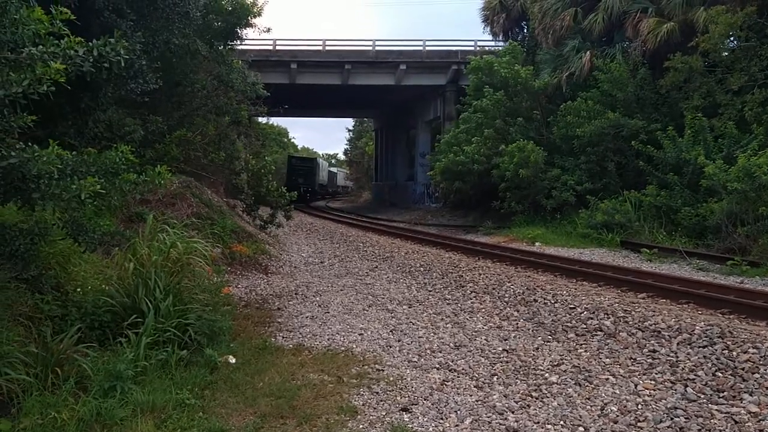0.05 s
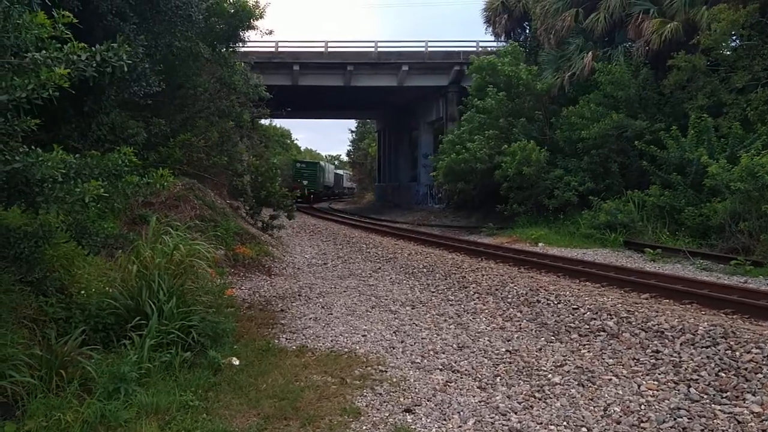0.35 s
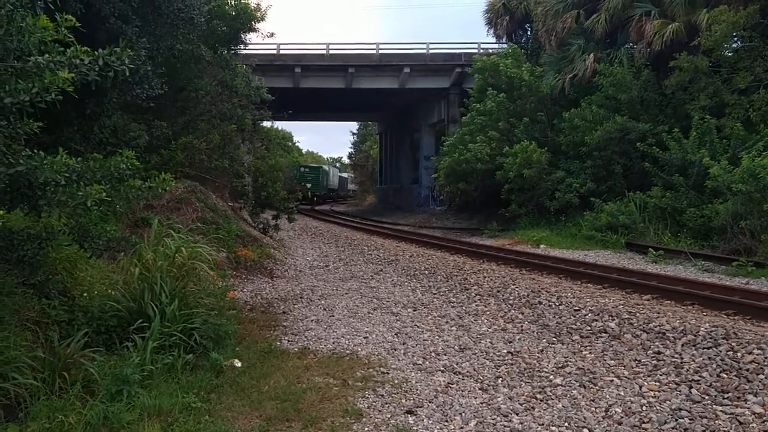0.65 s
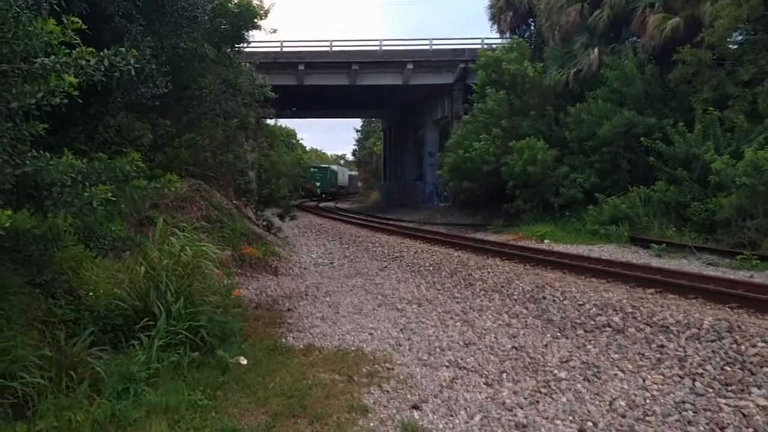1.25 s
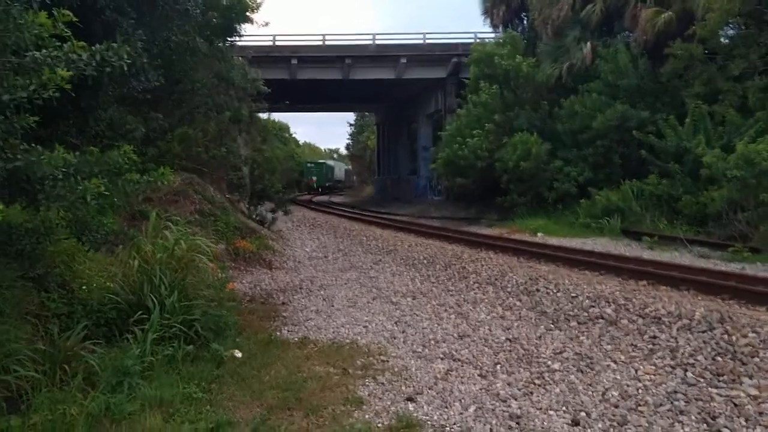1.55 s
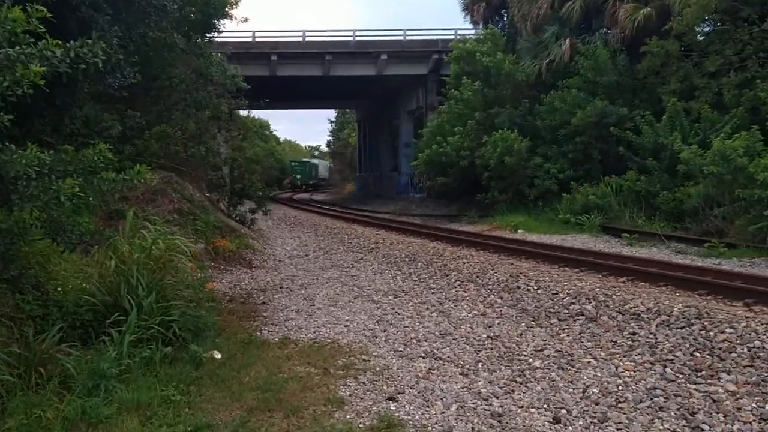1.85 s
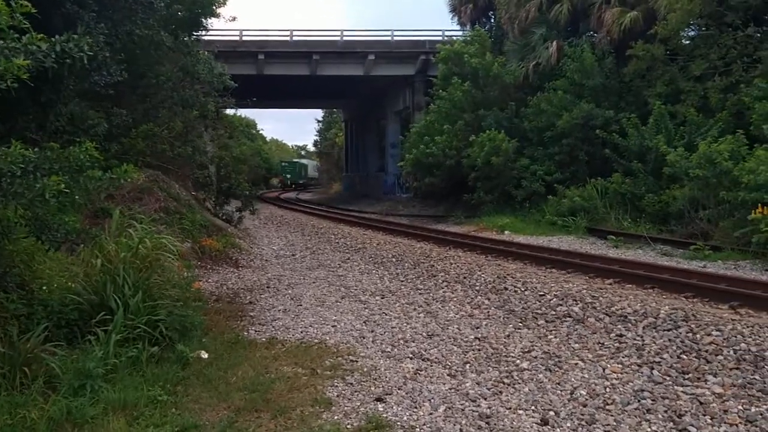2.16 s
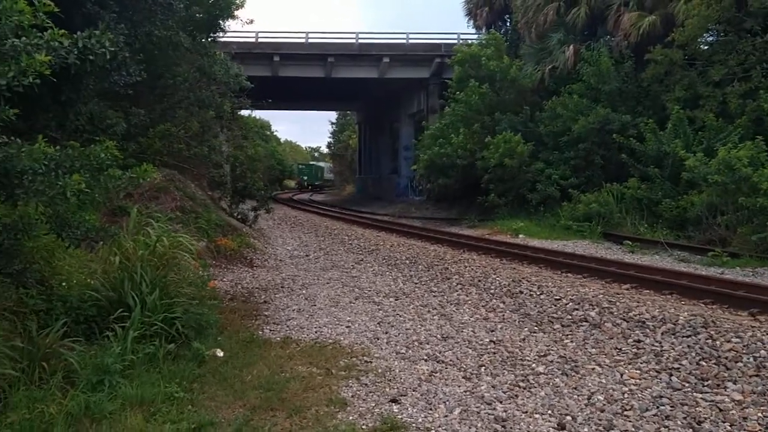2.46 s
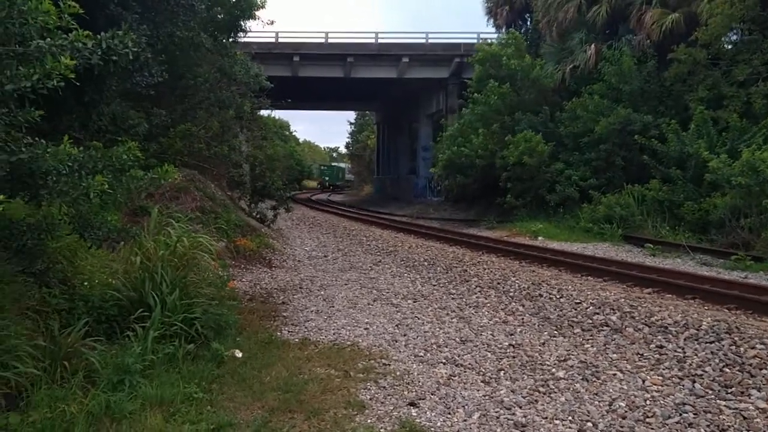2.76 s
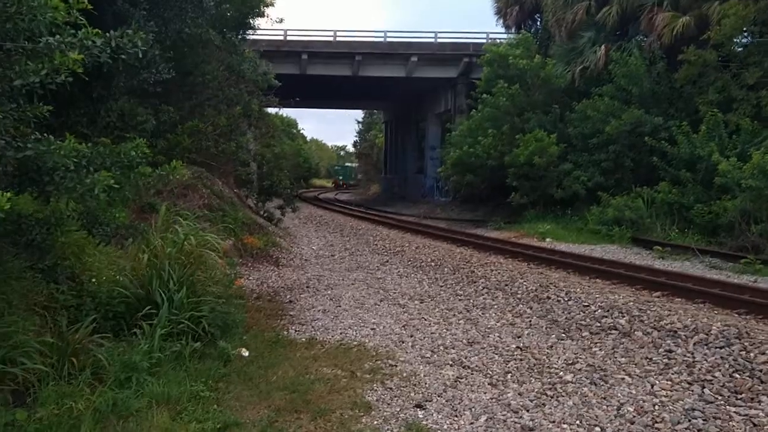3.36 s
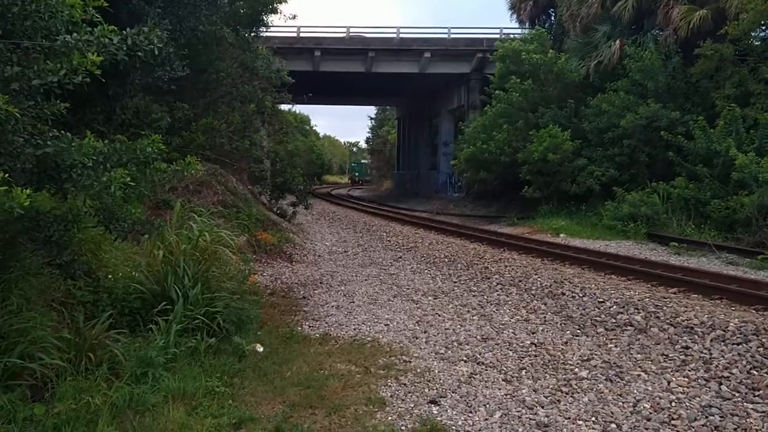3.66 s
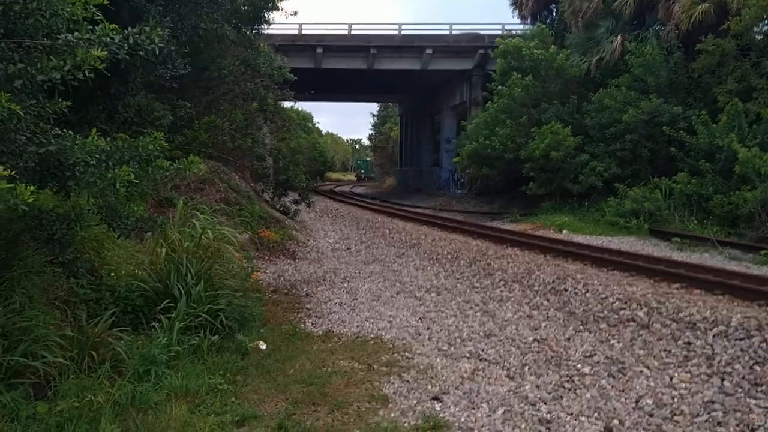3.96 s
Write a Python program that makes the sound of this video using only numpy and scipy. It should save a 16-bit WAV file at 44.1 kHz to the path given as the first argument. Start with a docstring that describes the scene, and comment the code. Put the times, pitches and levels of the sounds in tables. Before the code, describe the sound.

A train's last car recedes under a road bridge, heard from the trackside. Rolling noise and thin steel squealing give way to fast, regular wheel thuds and a few sharp metallic snaps, all growing steadily fainter.

```python
"""Last train car rolling away

The car recedes along ballasted track and under a road bridge. Rough wheels and rail rumble and
roar, rubbing steel sings and squeals, and it all fades into a distant wash. Once a wheel turn a
flat spot strikes the rail: a thud of the track with a steel clank, scattered by trees and the
bridge. A few sharp snaps cut through along the way."""
import sys
import numpy as np
from scipy import signal
from scipy.fft import rfft, irfft
from scipy.io import wavfile
from scipy.ndimage import uniform_filter1d

SR = 44100
rng = np.random.default_rng(int(sys.argv[2]) if len(sys.argv) > 2 else 0)


def generate_wav(signal):
    """Clip the signal to [-1, 1] and save it as 16-bit WAV at the path in sys.argv[1]."""
    frames = np.transpose(np.atleast_2d(signal))
    scaled = np.clip(frames, -1, 1) * 32767
    pcm = np.round(scaled).astype(np.int16)
    wavfile.write(sys.argv[1], SR, pcm)


N = 176400

# Hits of the flat spot. Each row: start in seconds, then thud, clank and treble in relative dB.
BLOWS = [(.960, -21.5, -32.5, -62), (1.125, -28, -29.5, -55), (1.280, -20.5, -27.5, -60),
         (1.441, -17.5, -28.5, -67), (1.597, -21, -30.5, -47), (1.757, -21, -31.5, -40.5),
         (1.917, -22, -33.5, -42.5), (2.077, -25, -36.5, -46), (2.237, -26.5, -42, -49.5),
         (2.398, -28.5, -46.5, -51.5), (2.556, -27, -47, -48), (2.717, -27, -45, -48.5),
         (2.876, -28.5, -41.5, -46), (3.035, -28.5, -41, -45), (3.195, -29.5, -43.5, -49),
         (3.355, -23, -42.5, -47), (3.515, -34.5, -43, -51), (3.675, -37, -46.5, -50),
         (3.834, -34, -46.5, -52), (3.991, -37.5, -39, -54)]
# Steel snaps. Each row: start in seconds, then crack and knock in relative dB.
SNAPS = [(1.4005, -37, -70), (1.5625, -27, -50), (1.5714, -49, -53), (1.598, -21, -29.5),
         (1.6041, -17.5, -35)]
# Slaps off the bridge. Each row: delay in seconds, level against the thud in dB when fully wet.
BRIDGE_ECHOES = [(0.0154, -5.5), (0.0247, -7.5)]
# Wheel squeals. Each row: centre and half length in seconds, pitch and wander in Hz, level in dB.
SQUEALS = [(.235, 0.022, 2960, 60, -32.5), (0.31, .04, 6750, 10, -30), (2.365, 0.074, 1490, 9.7, -55)]

# Struck bodies. Each row: pitch in Hz, relative level in dB, time to fall 60 dB in seconds.
TRACK_MODES = [(78, -27.5, .08), (114, -10.5, 0.09), (132.3, 1, 0.074), (165, -6, 0.04), (185, -3.5, .055)]
WHEEL_MODES = [(564, -4, 0.15), (1050, -3.5, 0.3), (1104, 2.5, 0.25), (1129, -3.5, 0.42),
               (1536, -13.5, 0.2), (1880, -15, 0.23), (1995, -9.5, 0.13), (2420, -10.5, 0.17)]
KNOCK_MODES = [(165, -0.5, 0.046), (257, 0, .05), (300, 6.5, 0.043), (355, 4.5, 0.046), (430, -13, .05),
               (556, -5, .05)]

# Ringing peaks in noise. Each row: centre in Hz, half width in Hz, relative level in dB.
WHEEL_RAIL_PEAKS = [(568, 83, 2.5), (1098, 17, 7.5), (1508, 118, 4.5), (1946, 16, -0.5), (1926, 39, 0.5),
                    (2444, 20, 2.5)]
FAR_RAIL_PEAKS = [(375, 12, -3.5), (555, 89, -1), (964, 110, -4), (1470, 91, 2), (1970, 70, -2.5),
                  (2560, 47, 5.5), (4480, 150, -2)]
SING_PEAKS = [(3250, 160, -15), (4540, 10, -19), (5070, 90, -23), (5595, 14, -8), (5700, 30, -14),
              (6228, 20, -1), (6455, 60, -6), (6790, 18, 0), (6930, 50, -10), (7210, 22, -7),
              (7308, 16, -3), (7392, 22, -3), (7465, 35, -4), (7620, 90, -11), (7890, 45, -7),
              (8105, 40, -11)]

# EQ curves for the noise layers. Each row: frequency in Hz, relative level in dB.
THUD_TAIL_EQ = [(30, -27.5), (70, -9.5), (110, 0.5), (140, -0.5), (190, -4.5), (240, -17), (400, -31.5)]
CLANK_EQ = [(150, -14.5), (290, -11), (350, 4), (430, -2.5), (540, 0), (750, -7.5), (950, -0.5),
            (1270, -5.5), (1550, -2), (2500, -9), (3500, -16), (5000, -46), (9000, -46)]
TREBLE_EQ = [(1200, -12), (2800, 14.5), (4000, 12.5), (5500, 6), (7500, 2.5), (9000, -42)]
RUMBLE_EQ = [(20, -35.5), (40, -27), (65, -9.5), (90, -3), (115, 0), (165, 2.5), (215, -1.5), (250, -13),
             (400, -26), (900, -69)]
ROAR_EQ = [(120, -19.5), (270, -4.5), (540, 0.5), (760, -2), (1000, 1.5), (1270, -2), (1550, -1.5),
           (1900, 2.5), (2700, 0.5), (3300, -11), (3700, -25.5), (4300, -28), (6000, -27), (9000, -48)]
WASH_EQ = [(120, -13.5), (290, -7), (370, -0.5), (600, -1), (760, -4), (1490, -9.5), (2600, -13.5),
           (3500, -13), (4450, -14), (5500, -17.5), (7100, -19.5), (8000, -37.5), (10000, -68)]
HISS_EQ = [(2500, -21), (3500, -6), (4300, -17), (5200, -7.5), (6200, 4.5), (6700, 3), (7400, 4),
           (8000, -23), (9000, -29)]

# Fader moves as the car leaves. Each row: time in seconds, relative level in dB.
RUMBLE_FADER = [(0, -29), (.4, -32), (.55, -31.5), (.77, -31), (1.05, -35.5), (1.25, -33.5), (1.4, -39),
                (1.8, -40), (2.03, -44), (2.35, -49), (2.5, -53), (2.8, -46), (3.3, -51.5), (3.55, -57.5),
                (4, -55)]
ROAR_FADER = [(0, -28.5), (.17, -28.5), (.23, -26.5), (.31, -28.5), (.39, -27.5), (.47, -33.5), (.8, -35.5),
              (1.1, -37), (1.25, -36), (1.38, -41), (1.56, -41), (1.72, -47), (2, -50), (2.36, -53.5),
              (3.5, -59.5), (4, -61)]
SING_FADER = [(0, -27.5), (.24, -27.5), (.35, -30.5), (.44, -37), (.53, -46.5), (.8, -66.5), (1.5, -71.5),
              (1.7, -79.5)]
HISS_FADER = [(0, -34.5), (.26, -31.5), (.42, -35), (.53, -44), (.8, -50), (1.1, -56.5), (1.19, -50),
              (1.23, -47.5), (1.32, -50), (1.39, -58.5), (1.47, -52), (1.54, -56.5), (1.65, -56),
              (1.72, -82)]

ECHO_GROWTH_DB_PER_S, ECHO_FULL_S = 10, 2.43  # echoes gain on the thud as the wheel recedes
FIRST_RISE_S, SMEAR_S_PER_S = 0.0043, 0.0026  # clank attacks soften with distance
WHEEL_NEAR_S, WHEEL_FADE_DB_PER_S = 1.66, 9.5  # the wheel's ring falls off either side of this time
WASH_FROM_S, WASH_RISE_S, WASH_FADE_DB_PER_S = 1.577, 0.1, 5.5
FAR_RAIL_GAIN, WHEEL_RAIL_GAIN = 0.67, 0.86  # strength of the peaks over the broad noise


def flat_spot_thuds():
    """The flat spot pounds the track on its sleepers; the bridge adds two echoes and a low tail."""
    out, t = np.zeros(N), np.arange(SR // 2) / SR
    scatter = noise(eq(THUD_TAIL_EQ))
    for at, db, _, _ in BLOWS:
        thud = undb(db - 1.4) * struck(t, TRACK_MODES, rise=0.0056)
        wet = undb(ECHO_GROWTH_DB_PER_S * min(at - ECHO_FULL_S, 0))
        onset = at - .003  # just ahead of the clank
        add(out, onset, thud)
        for delay, echo_db in BRIDGE_ECHOES:
            add(out, onset + delay, wet * undb(echo_db) * thud)
        i = rng.integers(N - len(t))
        tail = scatter[i:i + len(t)] * envelope(t, rise=0.018, t60=0.25)
        add(out, at + 0.02202, np.sqrt(wet) * undb(db - 13) * tail)
    low_band = signal.butter(2, [65, 246], "bandpass", fs=SR, output="sos")
    return signal.sosfilt(low_band, out)


def flat_spot_clanks():
    """The same blows clank the steel and ring the wheel, with bright grit on top."""
    out, size = np.zeros(N), SR // 2
    t = np.arange(size) / SR
    steel_bed = noise(eq(CLANK_EQ) * (1 + FAR_RAIL_GAIN * resonances(FAR_RAIL_PEAKS)))
    grit_bed = noise(eq(TREBLE_EQ))
    for at, _, clank_db, treble_db in BLOWS:
        # Half the noise power repeats every turn, so the hits sound related.
        i = rng.integers(size, N - size)
        steel, grit = (np.sqrt(.5) * (bed[:size] + bed[i:i + size]) for bed in (steel_bed, grit_bed))
        rise = FIRST_RISE_S + SMEAR_S_PER_S * (at - BLOWS[0][0])
        steel *= envelope(t, 1.18 * rise, t60=0.063, tail_db=-7.5, tail_t60=0.39)
        grit *= envelope(t, rise, t60=.1, tail_db=-13, tail_t60=0.52)
        wheel_db = clank_db + 2 - WHEEL_FADE_DB_PER_S * abs(at - WHEEL_NEAR_S)
        add(out, at, undb(clank_db - 3) * steel)
        add(out, at, undb(wheel_db) * struck(t, WHEEL_MODES, rise))
        add(out, at, undb(treble_db - 1.5) * grit)
    return out


def rolling():
    """Rough wheels shake the track and ring the steel; as the roar dies, a distant wash takes over."""
    rumble = noise(eq(RUMBLE_EQ)) * fader(RUMBLE_FADER) * undb(drift(17) - 1)
    roar = noise(eq(ROAR_EQ) * (1 + WHEEL_RAIL_GAIN * resonances(WHEEL_RAIL_PEAKS)))
    roar *= fader(ROAR_FADER) * undb(.5 * drift(40))
    since = np.arange(N) / SR - WASH_FROM_S
    wash = noise(eq(WASH_EQ) * (1 + FAR_RAIL_GAIN * resonances(FAR_RAIL_PEAKS)))
    wash *= undb(-45.5 - WASH_FADE_DB_PER_S * since + .5 * drift(12))
    fade_in = (1 + np.tanh(since / WASH_RISE_S)) / 2
    return rumble + roar + wash * fade_in


def wheel_singing():
    """Wheels rub sideways on the curve: high modes shimmer, and the hiss swells with each blow."""
    shimmer = np.zeros(N)
    for hz, width, db in SING_PEAKS:
        band = noise(resonances([(hz, width, db)]))
        shimmer += band * undb(db + 3.1 * drift(9)) * np.sqrt(width)
    drive = np.ones(N)
    kick = undb(4) * envelope(np.arange(SR // 2) / SR, rise=0.0067, t60=0.13)
    for at, *_ in BLOWS:
        add(drive, at, kick)
    hiss = noise(eq(HISS_EQ)) * drive * fader(HISS_FADER)
    return unit(shimmer) * fader(SING_FADER) * undb(-1.5) + hiss * undb(-1)


def steel_snaps():
    """Steel ticks lightly, then snaps twice with a short hollow knock."""
    out, t = np.zeros(N), np.arange(SR // 8) / SR
    crack_eq = eq([(200, -1), (1000, 11.5), (2500, 9.5), (4500, 0.5), (8000, -19)])
    for at, crack_db, knock_db in SNAPS:
        crack = noise(crack_eq)[:len(t)] * envelope(t, rise=0.00076, t60=0.005)
        add(out, at, undb(crack_db - 2.5) * crack)
        add(out, at, undb(knock_db + 10) * struck(t, KNOCK_MODES, rise=0.0015))
    return out


def wheel_squeals():
    """Now and then one wheel mode swells into an unsteady tone."""
    out, t = np.zeros(N), np.arange(N) / SR
    for centre, half_length, hz, wander, db in SQUEALS:
        pitch = hz + wander * drift(150)
        tone = np.sin(2 * np.pi * np.cumsum(pitch) / SR)
        swell = np.exp(-((t - centre) / half_length) ** 2)
        out += tone * undb(db + 1.5 * drift(90)) * swell
    return out


def struck(t, modes, rise):
    """Decaying modes, slightly detuned from hit to hit; peak 1."""
    x = np.zeros(len(t))
    for hz, db, t60 in modes:
        pitch = hz + 2 * rng.standard_normal()
        x += undb(db) * np.sin(2 * np.pi * pitch * t) * envelope(t, rise, t60)
    return x / np.abs(x).max()


def envelope(t, rise, t60, tail_db=-100, tail_t60=.1):
    """Shape of a hit: attack, quick decay and a scattered tail; times in seconds, peak 1."""
    attack = 1 - np.exp(-(t / rise) ** 2)
    decay = undb(-60 * t / t60)
    tail = undb(tail_db - 60 * t / tail_t60)
    shape = attack * np.hypot(decay, tail)
    return shape / shape.max()


def noise(gain):
    """Noise shaped by a gain per frequency; rms 1."""
    return unit(irfft(rfft(rng.standard_normal(N)) * gain, N))


def resonances(peaks):
    """Gain per frequency of a bank of resonators with steep skirts."""
    f = np.arange(N // 2 + 1) * SR / N
    return sum(undb(db) / (1 + ((f - hz) / width) ** 2) for hz, width, db in peaks)


def eq(points):
    """Gain per frequency along an EQ curve."""
    hz, db = np.array(points).T
    f = np.arange(N // 2 + 1) * SR / N
    return undb(np.interp(np.log(f + 1), np.log(hz), db))


def fader(points):
    """Gain over time along a fader move."""
    seconds, db = np.array(points).T
    return undb(np.interp(np.arange(N) / SR, seconds, db))


def drift(rate_hz):
    """Smooth random wobble; rms 1."""
    hold = int(SR / rate_hz)
    steps = np.repeat(rng.standard_normal(N // hold + 1), hold)
    return unit(uniform_filter1d(uniform_filter1d(steps, hold), hold)[:N])


def add(out, at, x):
    """Mix x in at a time in seconds."""
    i = min(max(int(at * SR), 0), N)
    out[i:i + len(x)] += x[:N - i]


def undb(db):
    """Decibels to gain."""
    return 10 ** (np.asarray(db) / 20)


def unit(x):
    """Scale to rms 1."""
    return x / np.sqrt(np.mean(x ** 2) + 1e-20)


def scene():
    """The mono mix, heard from beside the track."""
    wheels = rolling() + wheel_singing() + wheel_squeals()
    return (wheels + flat_spot_thuds() + flat_spot_clanks() + steel_snaps())[None]


def record(dry):
    """A steep low-pass takes off the air above 8350 Hz."""
    return signal.sosfilt(signal.ellip(10, .2, 80, 8350, fs=SR, output="sos"), dry)


dry = scene()
out = record(dry)
generate_wav(out)
```